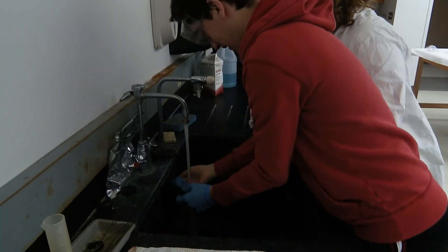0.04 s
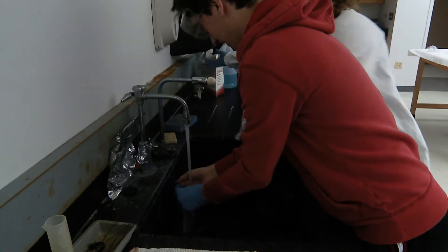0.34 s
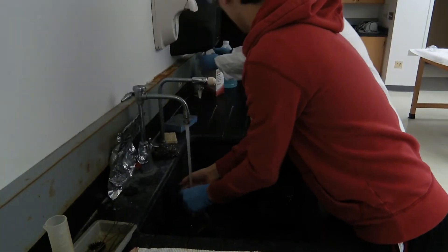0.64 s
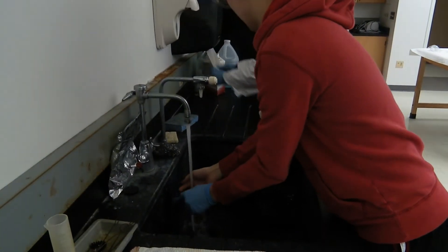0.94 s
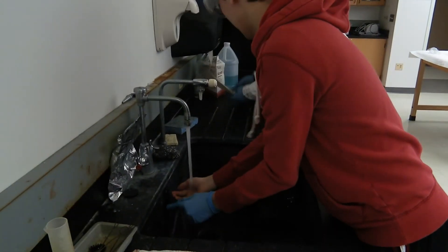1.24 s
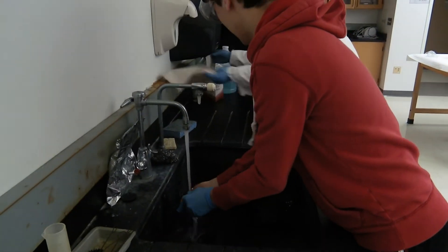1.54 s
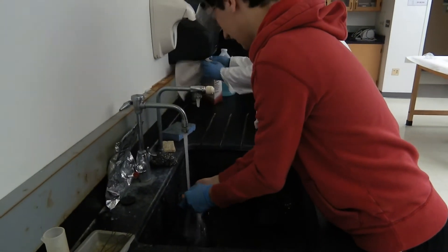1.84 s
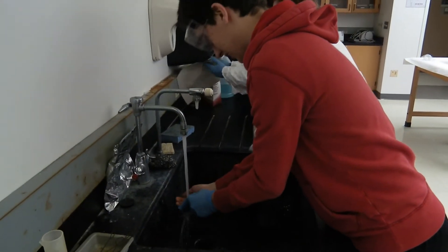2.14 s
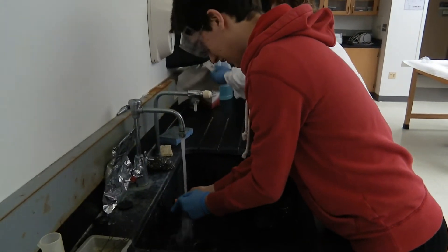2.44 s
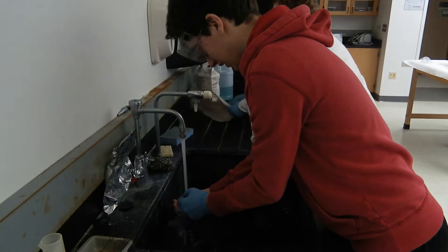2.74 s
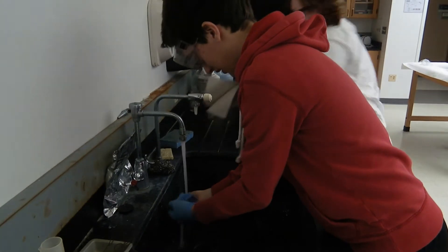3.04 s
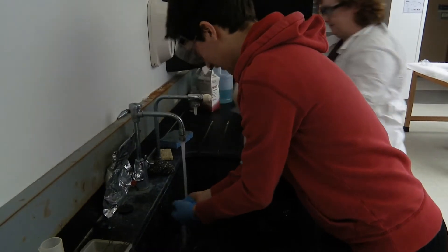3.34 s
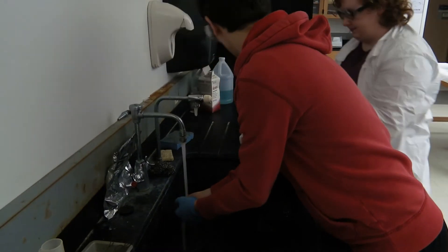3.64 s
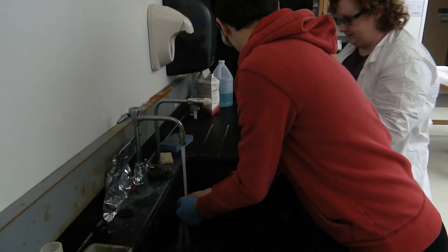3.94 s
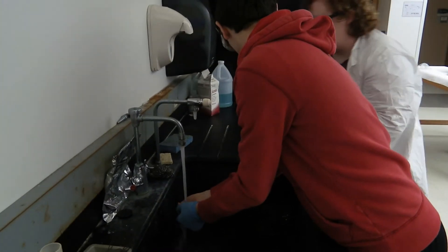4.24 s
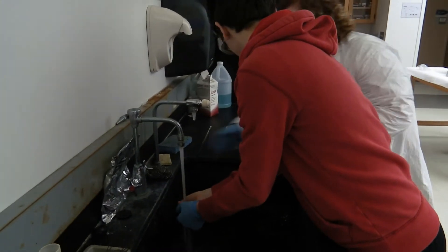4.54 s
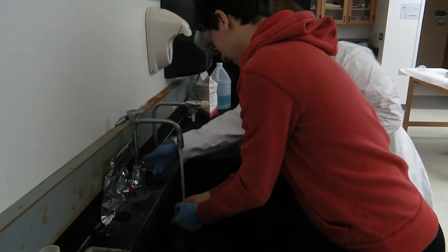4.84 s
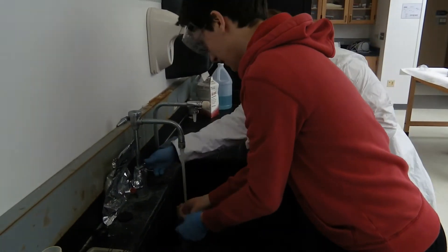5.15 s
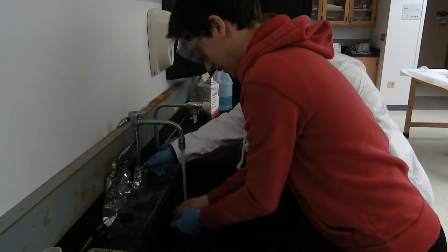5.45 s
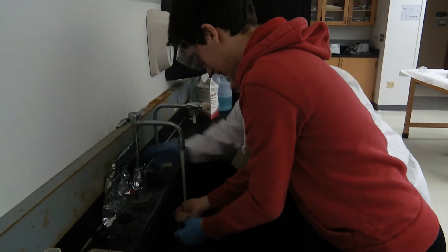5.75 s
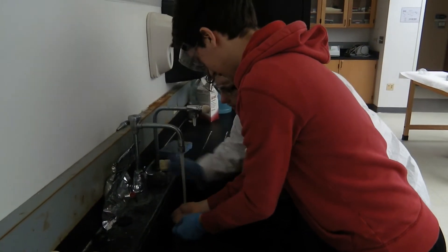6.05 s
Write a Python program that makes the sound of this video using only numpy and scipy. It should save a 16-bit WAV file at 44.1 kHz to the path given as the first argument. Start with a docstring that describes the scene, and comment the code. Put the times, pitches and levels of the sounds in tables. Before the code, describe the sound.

Tap water splashes steadily over gloved hands into a deep sink while paper towel is twice pulled and torn from a rattling dispenser.

```python
"""A deep lab sink. A tap runs over gloved hands: spray fizzes, bubbles gurgle, falling water drums
on the basin. Behind it, paper towel is pulled twice from a hollow plastic wall dispenser: the roll
rumbles and knocks in its housing, then the sheet tears off. Ventilation hums.
The sound is mono; an automatic gain drops at the loud tears and creeps back."""
import sys
import numpy as np
from scipy import signal
from scipy.fft import rfft, irfft, next_fast_len
from scipy.io import wavfile
from scipy.ndimage import uniform_filter1d, minimum_filter1d, map_coordinates

SR = 44100
rng = np.random.default_rng(int(sys.argv[2]) if len(sys.argv) > 2 else 0)


def dump(signal):
    """Clip the signal to [-1, 1] and save it as 16-bit WAV at the path in sys.argv[1]."""
    limited = np.clip(np.atleast_2d(signal).T, -1, 1)
    pcm = np.round(limited * 32767).astype(np.int16)
    wavfile.write(sys.argv[1], SR, pcm)


N = 268296

# Spectra. Each row: frequency in Hz, relative density in dB.
DUCT_SPECTRUM = [(15, -11), (38, 0.5), (60, -3), (90, 3.5), (125, -3), (170, -4.5), (260, -11), (500, -19),
                 (2000, -54)]
ROLL_SPECTRUM = [(40, -34), (95, -17), (125, 0), (180, -1), (250, -9), (345, -9), (450, -17), (700, -13),
                 (1000, -22), (1500, -20), (3000, -28), (6000, -35), (12000, -52)]
SHELL_SPECTRUM = [(150, -11), (400, 0), (750, -2), (1100, -3.5), (2000, -7), (3500, -25), (10000, -36)]
PAPER_SPECTRUM = [(600, -19), (1800, -7.5), (4000, -3), (6000, 0), (8000, -13), (15000, -31)]
WATER_SPECTRUM = [(200, -17), (320, -17), (450, -24.5), (900, -25), (1250, -23.5), (1700, -18),
                  (2450, -11.5), (3300, -13.5), (5000, -11.5), (7500, -10.5), (9500, -15.5), (11500, -16),
                  (13500, -19.0), (15700, -26)]
# Room decay. Each row: frequency in Hz, T60 in seconds.
ROOM_DECAY = [(120, 1), (1000, 0.14), (5000, 0.24), (14000, 0.072)]
# Towel pulls. Each row: grab time, tear time and spin-on length in seconds, rumble at the tear in dB.
TOWEL_PULLS = [(.66, 1.102, .21, -27), (2.546, 2.775, .04, -23)]
# Roll hitting the housing. Each row: start in seconds, peak in dB, favoured pitch in Hz, clatter in dB.
ROLL_KNOCKS = [(.678, -24, 125, -48), (0.86, -14, 155, -33), (1.031, -23, 125, -34), (1.094, -16, 310, -29),
               (1.131, -13, 150, -36), (1.274, -18.5, 130, -23), (2.189, -24, 150, -55),
               (2.627, -12, 290, -26), (2.675, -17, 135, -40), (2.756, -10, 230, -15.5),
               (2.779, -7.5, 140, -21), (2.845, -18, 135, -42), (2.92, -23, 120, -49)]
# Housing modes. Each row: frequency in Hz, relative level in dB, T60 in seconds.
HOUSING_MODES = [(117, -3.5, 0.2), (140.7, -1.5, .12), (172.6, -3.5, 0.13), (205, -4.5, 0.099),
                 (317, -5, 0.13), (361, -1, 0.2), (558, -6, 0.092), (685, -6, .09), (780, -4, .08),
                 (1180, -7, .07)]
# Sheet ripping along the teeth. Each row: centre in seconds, level in dB, half-width in seconds.
SHEET_RIPS = [(1.1, -23, 0.21), (2.692, -25, 0.061), (2.767, -20, 0.017)]
# Last fibres snapping. One row: level in dB, pitch in Hz, T60 in seconds.
FIBRE_SNAP = (1.5, 5900, .03)
# Splats off the gloves. Each row: start in seconds, relative level in dB, bubble pitch in Hz.
GLOVE_SPLATS = [(0.08, -15, 2980), (0.128, -13, 6400), (0.387, -6, 6100), (0.456, -18, 2550),
                (0.5, -11.5, 2670), (0.516, -10, 6900), (0.708, -6, 6400), (0.758, -12, 6700),
                (1.755, -16, 3020), (1.977, -8.5, 5200), (2.272, -12, 3900), (2.446, -10.5, 3270),
                (3.02, -8, 7540), (3.438, -13, 2930), (4.695, -11, 6500), (4.877, -14, 3000),
                (5.234, -7.5, 6100), (5.463, -10, 3900), (5.638, -10, 2750), (5.712, -10.5, 3050),
                (5.798, -13, 3000), (5.964, -10.5, 4000)]
# Resonances of basin, spout and spray. Each row: centre in Hz, width in Hz, lift in dB.
SINK_RESONANCES = [(620, 46, 8), (1389, 125, 10), (1797, 107, 7.5), (1949, 47, 9), (2021, 59, 6.5),
                   (2920, 78, 2), (3800, 65, 4.8), (5990, 460, 4.5), (6540, 1120, 6.5), (8850, 770, 7),
                   (10330, 1360, 12), (12761, 1114, 6), (15099, 61, 8.3)]
# Brief ducks of the automatic gain, heard on the water's hiss.
# Each row: start in seconds, depth in dB, return time in seconds.
GAIN_DUCKS = [(.765, 1.2, .2), (2.04, 1, 0.081), (4.37, 3.5, 0.051)]
# Tap fizz. Each row: time in seconds, level in dB.
SPRAY_LEVELS = [(0, -18), (.6, -18), (1.0, -18), (2.4, -18), (3.3, -17.5), (4.5, -18.5), (5.7, -18.5),
                (5.9, -17)]
# Runoff from the turning hands. Each row: time in seconds, gurgle in dB, basin drumming in dB.
RUNOFF_LEVELS = [(0.0, -27.4, -44), (0.18, -28, -47), (0.4, -26.5, -44), (0.8, -28.5, -45.9),
                 (1.65, -26, -40.5), (1.85, -26.3, -40), (2.1, -28.5, -45), (2.4, -27, -39.5),
                 (3.3, -26, -43), (3.6, -25, -44), (3.9, -26, -47), (4.5, -26, -40.5), (4.84, -25, -47.6),
                 (4.94, -27.5, -45), (5.58, -28, -46.5), (5.72, -27, -43), (6.08, -25.5, -44)]

TIME_S = np.arange(N) / SR


def amp(db):
    """Decibels to gain."""
    return 10 ** (np.asarray(db) / 20)


def unit_rms(x):
    """x at rms 1."""
    return x / np.sqrt(np.mean(x ** 2) + 1e-20)


def log_interp(points, hz):
    """(Hz, value) points read on a log axis."""
    knots_hz, values = np.transpose(points)
    return np.interp(np.log(hz + 1), np.log(knots_hz + 1), values)


def curves(rows):
    """One value per sample for each column after the time."""
    knots_s, *columns = np.transpose(rows)
    return [np.interp(TIME_S, knots_s, column) for column in columns]


def wobble(rate_hz):
    """Smooth curve through random knots."""
    return map_coordinates(rng.standard_normal(int(N * rate_hz / SR) + 4), [TIME_S * rate_hz])


def filtered(x, response):
    """x through a gain given as a function of Hz."""
    size = next_fast_len(N + SR // 2)
    return irfft(rfft(x, size) * response(np.fft.rfftfreq(size, 1 / SR)), size)[:N]


def coloured(x, spectrum):
    """x through a (Hz, dB) spectrum, rms 1."""
    return unit_rms(filtered(x, lambda hz: amp(log_interp(spectrum, hz))))


def add(track, start_s, sound):
    """Mix a short sound into the track."""
    part = track[max(round(start_s * SR), 0):][:len(sound)]
    part += sound[:len(part)]


def crackle(per_s, spread_db):
    """Tiny impacts of random time and size, rms 1."""
    polarity, size = rng.standard_normal((int(per_s * N / SR), 2)).T
    impacts = np.sign(polarity) * amp(spread_db * size)
    return unit_rms(np.bincount(rng.integers(0, N, len(impacts)), impacts, N))


def echo(x, decay):
    """Diffuse tail; each frequency dies at its own rate, from (Hz, T60 s) points."""
    hz, t, noise = signal.stft(rng.standard_normal(SR // 2), SR, nperseg=256)
    tail = signal.istft(noise * amp(-60 * t / log_interp(decay, hz)[:, None]), SR, nperseg=256)[1]
    return signal.fftconvolve(x, np.pad(tail, (90, 0)) / np.linalg.norm(tail))[:N]


def ventilation():
    """Low duct rumble with a mains hum."""
    hum = amp(-45.5 + wobble(3)) * np.sin(2 * np.pi * 119.5 * TIME_S)
    return amp(-42) * coloured(rng.standard_normal(N), DUCT_SPECTRUM) + hum


def pull_envelope(grab_s, tear_s, spin_s, tear_db, grab_db=-40, rise_s=.022, fall_db_per_s=105):
    """The roll gathers speed until the sheet tears, spins on, then runs down."""
    pull_db = np.interp(TIME_S, [grab_s, tear_s], [grab_db, tear_db])
    run_down_db = fall_db_per_s * np.maximum(TIME_S - tear_s - spin_s, 0)
    return amp(pull_db - run_down_db) * np.clip((TIME_S - grab_s) / rise_s, 0, 1)


def dispenser(knock_rise_s=.006, clatter_t60_s=.14):
    """The turning roll judders and knocks against the hollow housing, whose shell clatters."""
    turning = sum(pull_envelope(*row) for row in TOWEL_PULLS)
    rumble = turning * coloured(crackle(per_s=1100, spread_db=.5), ROLL_SPECTRUM)
    knocks, clatter = np.zeros((2, N))
    t = np.arange(SR // 3) / SR
    for start_s, peak_db, contact_hz, clatter_db in ROLL_KNOCKS:
        ring = np.zeros(len(t))
        for hz, mode_db, t60_s in HOUSING_MODES:
            envelope = amp(mode_db + rng.normal(0, 1) - 60 * t / t60_s)
            # The contact point favours some modes.
            mismatch = np.hypot(1, 3.9 * (hz / contact_hz - contact_hz / hz))
            ring += envelope * np.sin(2 * np.pi * hz * t) / mismatch
        ring *= 1 - np.exp(-t / knock_rise_s)
        add(knocks, start_s, amp(peak_db) * ring / np.abs(ring).max())
        add(clatter, start_s, amp(clatter_db - 60 * t / clatter_t60_s))
    return rumble + knocks + clatter * coloured(rng.standard_normal(N), SHELL_SPECTRUM)


def towel(snap_s=1.147, snap_rise_s=.0006):
    """Fibres break in quick runs; the first sheet comes free with a sharp snap."""
    effort = sum(amp(db) * np.exp(-((TIME_S - centre_s) / half_width_s) ** 2)
                 for centre_s, db, half_width_s in SHEET_RIPS)
    tearing = effort * coloured(crackle(per_s=3000, spread_db=3.5), PAPER_SPECTRUM)
    db, hz, t60_s = FIBRE_SNAP
    t = np.arange(SR // 20) / SR
    flutter_rad = np.cumsum(.3 * rng.standard_normal(len(t)))  # the loose edge has no clean pitch
    envelope = amp(db - 60 * t / t60_s) * (1 - np.exp(-t / snap_rise_s))
    add(tearing, snap_s, envelope * np.sin(2 * np.pi * hz * t + flutter_rad))
    return tearing


def splats(slap_t60_s=.04, t60_cycles=50):
    """Water slaps the glove and traps four bubbles of similar size; the basin answers briefly."""
    slaps = np.zeros(N)
    t = np.arange(SR // 20) / SR
    for start_s, db, bubble_hz in GLOVE_SPLATS:
        gain = amp(db - 8)
        add(slaps, start_s, gain * amp(-60 * t / slap_t60_s) * rng.standard_normal(len(t)))
        for delay_s, hz in zip(rng.exponential(.002, 4), bubble_hz * rng.lognormal(0, .08, 4)):
            chirp = np.sin(2 * np.pi * hz * t * (1 + 4 * t))
            add(slaps, start_s + delay_s, gain * amp(-60 * t * hz / t60_cycles) * chirp)
    spectrum_hz_db = [(900, -22), (2200, 0), (7000, 0), (15000, -14)]
    direct = filtered(slaps, lambda hz: amp(log_interp(spectrum_hz_db, hz)))
    return direct + amp(-5) * echo(direct, [(1000, .09), (10000, .06)])


def bubbles(per_s, low_hz, high_hz, cycles, spread_db, rise, samples):
    """Bubbles ring down over some cycles while their pitch rises, rms 1."""
    when, pitch, strength, life = rng.random((int(per_s * N / SR), 4), np.float32).T[:, :, None]
    hz = low_hz + (high_hz - low_hz) * pitch
    t = np.arange(samples, dtype=np.float32) / SR
    age = t * hz / (cycles * (.5 + life))
    gain = amp(spread_db * np.minimum(-np.log(1 - strength), 4)) * np.sqrt(hz)
    rings = gain * np.exp(-age) * np.sin(2 * np.pi * hz * t * (1 + rise * age))
    positions = (when * N).astype(int) + np.arange(samples)
    return unit_rms(np.bincount(positions.ravel(), rings.ravel(), N)[:N])


def in_sink(x, low_hz, high_hz):
    """One band of the water, with sink resonances and faint basin reflections, rms 1."""
    def response(hz):
        lift_db = sum(db / (1 + (2 * (hz - centre_hz) / width_hz) ** 2)
                      for centre_hz, width_hz, db in SINK_RESONANCES)
        band_loss = (1 + (low_hz / (hz + 1)) ** 16) * (1 + (hz / high_hz) ** 16)
        return amp(log_interp(WATER_SPECTRUM, hz) + lift_db) / np.sqrt(band_loss)
    reflections = amp(-13) * echo(x, [(1000, .08), (10000, .06)])
    return unit_rms(filtered(x + reflections, response))


def gain_duck_db(start_s, depth_db, return_s, fall_s=.02):
    """One duck at a set time: the gain falls quickly and eases back."""
    age_s = TIME_S - start_s
    return depth_db * np.clip(age_s / fall_s, 0, 1) * np.exp(-(age_s / return_s) ** 2 / 2)


def tap_water():
    """Droplets and small bubbles fizz, larger bubbles gurgle, runoff drums on the basin."""
    spray_db, = curves(SPRAY_LEVELS)
    gurgle_db, drum_db = curves(RUNOFF_LEVELS)
    fizz = crackle(per_s=30000, spread_db=3.5)
    fizz += .7 * bubbles(7000, low_hz=4000, high_hz=16000, cycles=14, spread_db=3, rise=.003, samples=330)
    gurgle = crackle(per_s=13000, spread_db=3.2)
    gurgle += .45 * bubbles(per_s=1800, low_hz=1600, high_hz=6200, cycles=9,
                            spread_db=2.6, rise=.015, samples=800)
    drum = crackle(per_s=2600, spread_db=3)
    sputter = wobble(35)  # the stream breaks up unevenly, in all bands at once
    sway_db = .2 * wobble(10)
    stream = (amp(spray_db + .4 * sputter) * in_sink(fizz, low_hz=5380, high_hz=19600)
              + amp(gurgle_db + .72 * sputter) * in_sink(gurgle, low_hz=1240, high_hz=5180)
              + amp(drum_db + .5 * sputter) * in_sink(drum, low_hz=214, high_hz=1257))
    return amp(sway_db - sum(gain_duck_db(*row) for row in GAIN_DUCKS)) * stream


def scene():
    """All sources in mono; dispenser and towel also excite the room."""
    at_wall = dispenser() + towel()
    mono = tap_water() + splats() + at_wall + amp(-15) * echo(at_wall, ROOM_DECAY) + ventilation()
    return np.array([mono, mono])


def gain_control(x, threshold_db, attack_s, hold_s, recovery_db_per_s):
    """Gain falls by the excess over the threshold, holds, then climbs back steadily."""
    power = np.abs(uniform_filter1d(x ** 2, size=SR // 170))
    excess_db = np.maximum(10 * np.log10(power + 1e-12) - threshold_db, 0)
    half_hold = int(hold_s * SR / 2)
    held_db = -minimum_filter1d(-excess_db, 2 * half_hold + 1, origin=half_hold)
    climb_db = recovery_db_per_s * TIME_S
    cut_db = np.maximum.accumulate(held_db + climb_db) - climb_db
    pole = np.exp(-1 / (attack_s * SR))
    return x * amp(-signal.lfilter([1 - pole], [1, -pole], cut_db))


def record(dry, ceiling=.95, top_hz=15750):
    """Automatic gain, soft ceiling and low-pass, the same on both channels."""
    x = gain_control(dry[0], threshold_db=-13.3, attack_s=.004, hold_s=.16, recovery_db_per_s=14.5)
    x = x / (1 + np.abs(x / ceiling) ** 8) ** (1 / 8)
    x = filtered(x, lambda hz: np.clip((top_hz - hz) / 200 + .5, 0, 1))
    return np.array([x, x])


dry = scene()
out = record(dry)
dump(out)
```